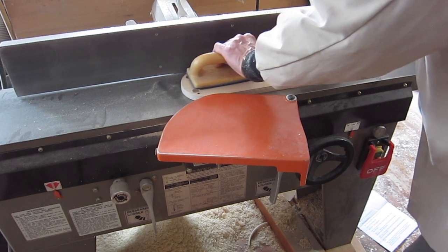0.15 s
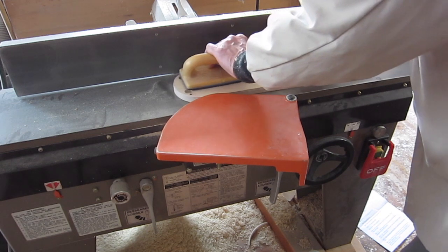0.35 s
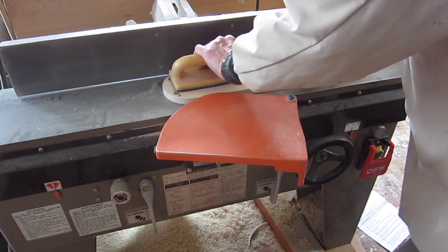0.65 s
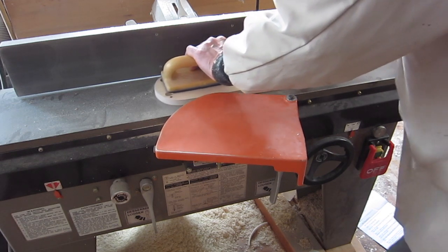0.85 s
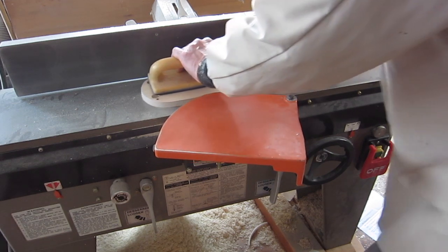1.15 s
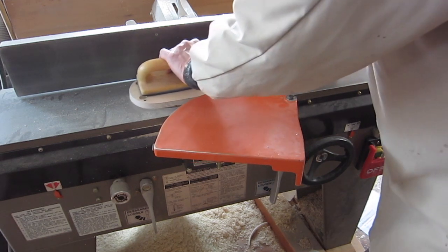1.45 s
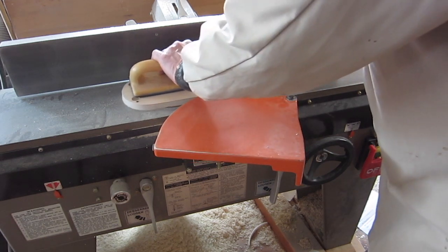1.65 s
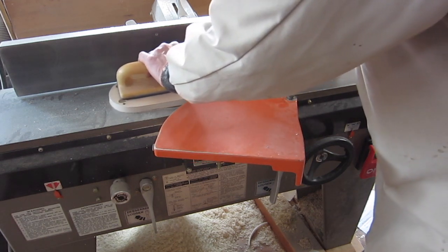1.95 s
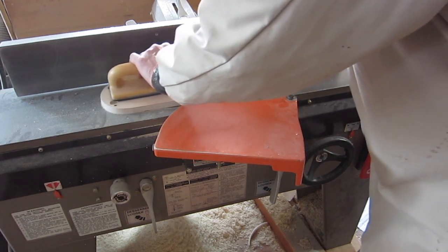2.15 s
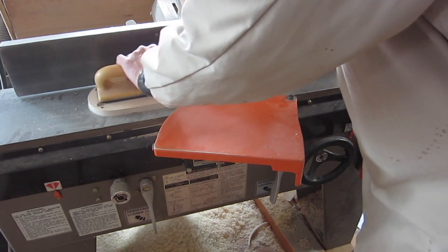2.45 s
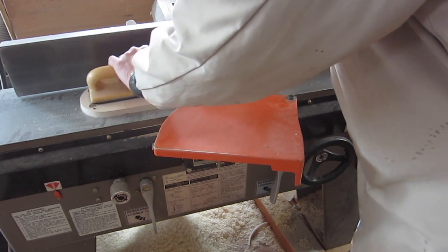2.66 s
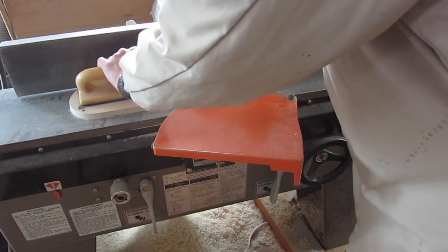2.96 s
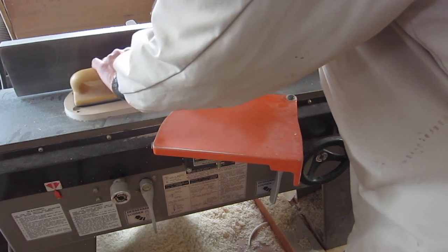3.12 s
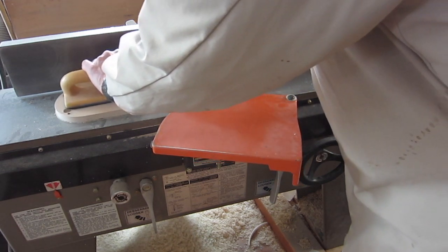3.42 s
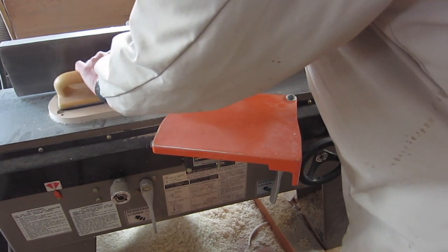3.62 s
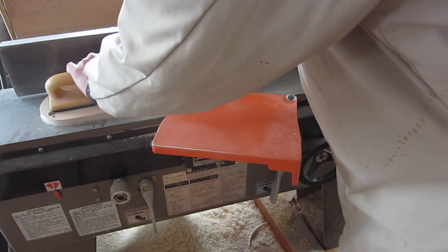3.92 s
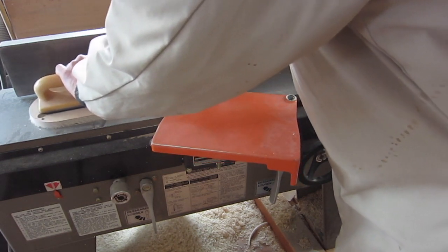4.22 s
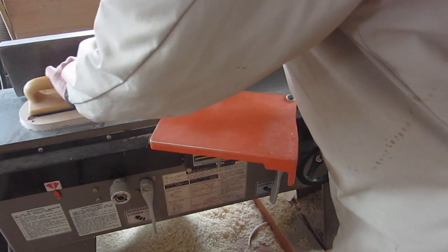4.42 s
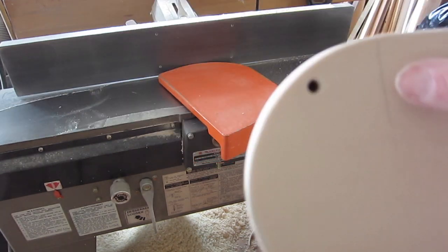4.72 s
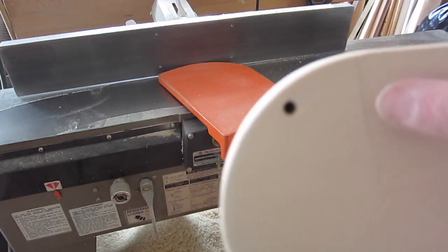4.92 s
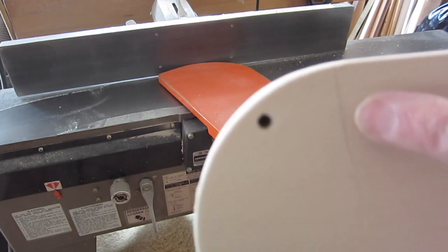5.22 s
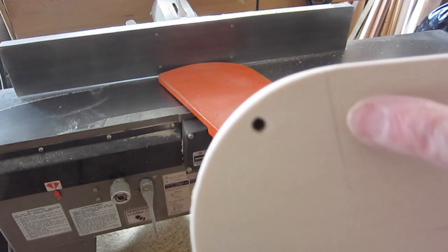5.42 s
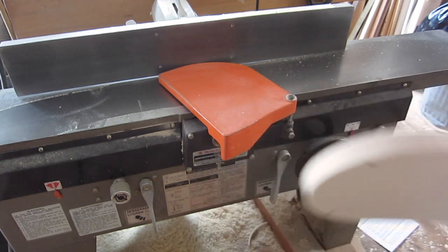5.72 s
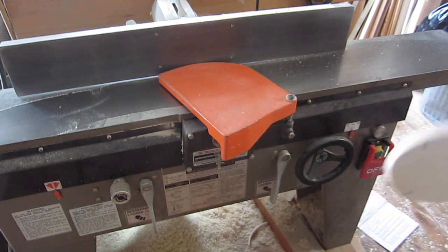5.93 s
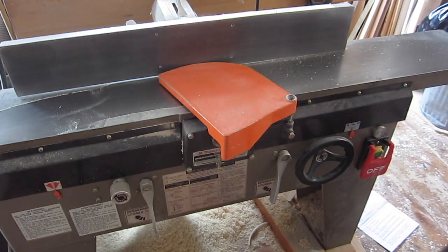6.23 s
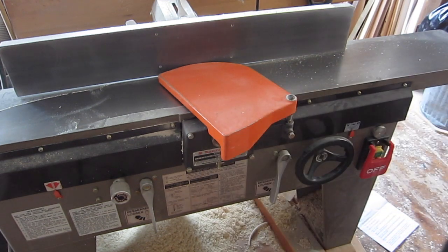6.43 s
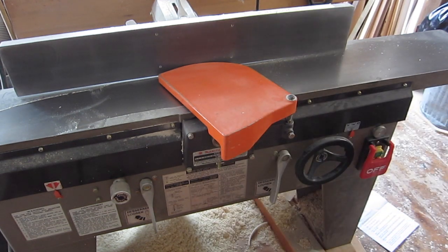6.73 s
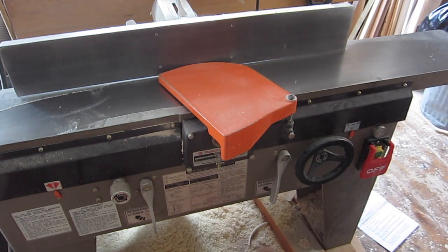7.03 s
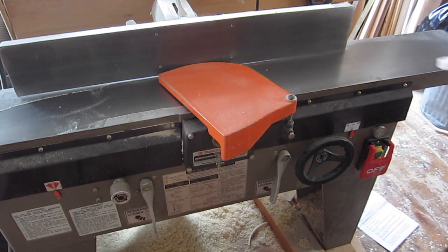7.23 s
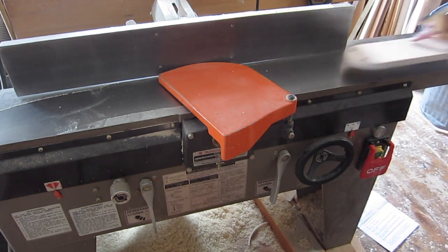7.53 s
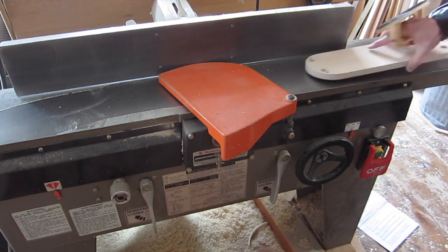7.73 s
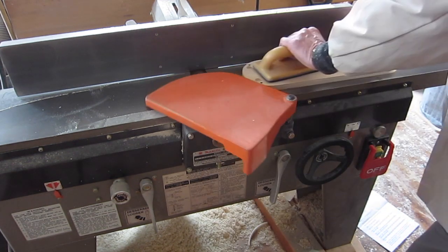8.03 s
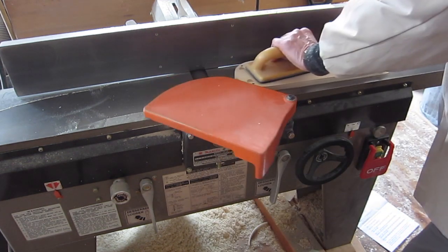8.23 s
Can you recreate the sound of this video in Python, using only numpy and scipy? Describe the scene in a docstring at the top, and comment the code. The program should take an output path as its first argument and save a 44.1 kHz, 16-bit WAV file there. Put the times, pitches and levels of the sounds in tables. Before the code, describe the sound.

A jointer's spinning cutterhead skims plywood with a loud singing, rasping roar that sags in pitch, then abruptly changes to a steady open whir.

```python
"""A singing, rasping roar comes first: a jointer's five-row spiral cutterhead skims plywood close by in a workshop.
The cut drags the speed down and later lets it recover a little; sine tones for cutters and motor follow its
multiples, over filtered noise for air whir and chip hiss, and short ticks and a buzz for the bites.
Then the sound jumps to the same machine running free: open whir, a siren tone, motor hum and whine.
A few soft low bumps, made of short bursts of rumble, fall in both parts."""
import sys
import numpy as np
from scipy import signal
from scipy.fft import rfft, irfft, next_fast_len
from scipy.io import wavfile

SR = 44100
rng = np.random.default_rng(int(sys.argv[2]) if len(sys.argv) > 2 else 0)


def to_wav(s):
    """Save 16-bit WAV."""
    ch = np.atleast_2d(s).T  # columns
    pcm = np.round(np.clip(ch, -1, 1) * 32767)  # PCM
    wavfile.write(sys.argv[1], SR, pcm.astype(np.int16))


N = 369116
T = np.arange(N) / SR  # time (s)
LEFT_RIGHT = np.array([[1], [-1]])  # the side signal is added on the left, subtracted on the right
JUMP_S = 4.525  # middle of the jump from cutting to running free
TOP_HZ = 15500  # nearly nothing is left above this
ROWS = 5  # rows of cutters round the head

# motor tones as multiples of head speed: its hum, its whine and the side tone just under the whine
HUM, WHINE, UNDER_WHINE = 2.7, 32.58, 31.33

# Background
# faint even hiss on top [f/Hz, level/dB per Hz]
FIZZ = [(7000, -130), (10500, -96), (15500, -96)]
# soft low bumps, before their rise and decay shape them [t/s, level/dB]
BUMPS = [(1.089, -50), (1.2, -53), (6.119, -59), (6.199, -55), (7.385, -47), (7.46, -59), (7.939, -59)]
# filter for the bumps [f/Hz, level/dB]
BUMP_COLOUR = [(20, -16), (50, -4), (85, -1), (140, 0), (300, -30), (1000, -80)]
# spread between the ears [f/Hz, side minus mid/dB]
WIDTH = [(60, -43), (120, -32), (250, -20.5), (500, -19.5), (1000, -14.5), (2000, -8.5), (4000, -1.5),
         (8000, -3), (12000, -3.5)]
# lean of the sound [f/Hz, left minus right/dB]
LEAN = [(60, 0), (250, 0), (1000, -0.3), (2000, -1.6), (4000, -1), (8000, 2), (12000, -1)]

# Speed of the head
# turning speed while cutting [t/s, turns a second/Hz]
CUT_SPEED = [(0.0, 101.63), (0.35, 101.25), (0.7, 100.05), (1.5, 95.67), (2.0, 93.44), (2.5, 91.76),
             (2.95, 90.91), (3.6, 90.85), (4.1, 91.83), (4.5, 93.34)]
# turning speed running free [t/s, turns a second/Hz]
FREE_SPEED = [(4.5, 104.85), (5.5, 105.15), (7.8, 105.72), (7.98, 106.45), (8.37, 106.45)]

# Air and running free
# air torn by the head at the table lips, before cavities and gain [f/Hz, level/dB per Hz]
AIR = [(25, -99), (50, -100), (100, -80.5), (160, -74.5), (250, -70), (460, -65), (650, -61.5),
       (1000, -59.5), (1400, -61), (3200, -64.5), (4100, -68.5), (6000, -73), (10000, -86), (12500, -99)]
# cavities of the guard, tables and chute [f/Hz, width/Hz, lift/dB]
CAVITIES = [(241, 67, 5.5), (375, 67, 6.5), (614, 88, 7), (859, 90, 5), (1142, 154, 2.5), (1560, 57, 3.5),
            (1682, 52, 3.5), (2078, 274, 6), (2510, 160, 4), (2880, 230, 2), (3160, 76, 5), (3380, 190, 2),
            (3630, 160, 1), (4700, 120, -1.5), (5800, 350, 2.5), (6300, 200, 2), (7840, 390, 4.5)]
# gain of the whir running free [t/s, level/dB]
FREE_WHIR = [(4.5, -1.1), (5.2, -1), (6.1, 0), (6.3, -1.1), (6.8, -0.5), (7.8, -1), (7.9, -1.5),
             (8.37, -0.5)]
# siren tone of the five rows passing the table lip, running free [t/s, level/dB]
SIREN = [(4.5, -36.5), (5.2, -35.5), (5.8, -38.5), (6.15, -37.5), (6.35, -48), (6.7, -36.5), (7.75, -35.5),
         (7.95, -43), (8.37, -40.5)]
# other tones running free [multiple of head speed, first level/dB, last level/dB]
FREE_TONES = [(1, -52.5, -49.5), (2, -58.5, -43.5), (HUM, -43, -45), (6.96, -42.5, -44), (9, -44, -47),
              (10, -43, -38.5), (15, -42, -53), (WHINE, -38.5, -43.5)]
ROW_PULSING, TURN_PULSING = .16, .38  # share by which the whir pulses per row, and the chip spray per turn
STIR_DB, STIR_RATE = 1.0, 19  # eddies in the whir: depth (dB), new random values a second
FADE_DB, FADE_RATE = 1, 2.51  # fading of the free-running tones: depth (dB), new random values a second

# Bites and chips
# gains while the board is fed [t/s, air whir/dB, chip hiss/dB]
FEED = [(0, -5.5, -4.5), (.6, -6, -5), (1.2, -5, -4), (1.5, -6.5, -4.5), (2, -6, -5), (2.5, -9.5, -9),
        (3, -6.5, -10), (3.5, -7, -6), (3.9, -6, -9), (4.5, -10, -5)]
# splinters leaving the board, before gain [f/Hz, level/dB per Hz]
CHIPS = [(200, -92), (500, -65.5), (900, -64.5), (1800, -69.5), (3200, -72), (4500, -76), (6300, -73.5),
         (8200, -78), (10000, -84.5), (12500, -125)]
# buzz of the cutter that stands proudest, once a turn, before gain [f/Hz, level/dB per Hz]
BUZZ = [(300, -100), (700, -70), (1600, -67), (2600, -77), (3500, -76), (5000, -77), (7800, -83),
        (9500, -85), (12000, -120)]
BITE_RING_S = .018  # the ring of one bite in board and table falls to about a third in this time
# how hard each of the five rows strikes the wood, one standing proud [level/dB]
ROW_STRIKES_DB = [-7, 0, -6, -12, -12]
# sharp chop of the cutters entering the wood [t/s, level/dB]
CHOP = [(0, -34), (.8, -36), (1.05, -39.5), (1.24, -33.5), (1.55, -42), (1.8, -41), (2.05, -35.5),
        (2.7, -34), (2.95, -41), (3.3, -38.5), (3.8, -36.5), (4.5, -39)]
# filter for the chop [f/Hz, level/dB]
CHOP_COLOUR = [(200, -22), (600, -3), (1400, -3), (2200, -5), (2700, -2), (3100, 5), (3600, 2), (4200, -6),
               (6500, -10), (8000, -19), (10000, -28), (12500, -50)]
CHOP_SCATTER_DB, CHOP_JITTER_TURNS = 2, .003  # random spread of strike strength and angle

# Singing
# tone of the rows passing as the board slides over the head [t/s, level/dB]
ROW_TONE = [(0, -41), (.42, -48), (.75, -35.5), (1.03, -34.5), (1.27, -27), (1.48, -35), (2.4, -36),
            (3.5, -40.5), (4.1, -28.5), (4.47, -35.5)]
# its octave, at twice the frequency [t/s, level/dB]
ROW_OCTAVE = [(0.02, -35), (.8, -36.5), (1.3, -38), (1.6, -38), (2.1, -34.5), (2.52, -43.5), (2.72, -39),
              (3.22, -49), (3.82, -27.5), (4.12, -25.9), (4.47, -33)]
# its twelfth, at three times the frequency [t/s, level/dB]
ROW_TWELFTH = [(0.02, -55), (0.22, -43), (1.72, -43), (1.82, -33.5), (2.22, -31), (2.62, -36.6),
               (3.02, -49), (3.82, -40.5), (4.47, -36.5)]
# its higher overtones at full bite, before resonances [f/Hz, level/dB]
ROW_OVERTONES = [(1800, -45), (2300, -46), (2800, -46), (3400, -48.5), (4200, -49), (5500, -53),
                 (7800, -53.5)]
# whine of the staggered cutters at full bite, one multiple below each row tone [f/Hz, level/dB]
STAGGER = [(380, -48), (1300, -50), (2300, -50.5), (2700, -47), (3400, -42.5), (4500, -46.5), (6000, -47.5),
           (7500, -48.5), (9300, -55)]
# hum of shaft and cutters, then motor hum and whine, before resonances [multiple of head speed, level/dB]
DRIVE_TONES = [(1, -72), (2, -59), (3, -57), (6, -45), (11, -49), (33, -60), (36, -53.5), (37, -53),
               (43, -52), (HUM, -54), (2 * HUM, -53.5), (3 * HUM, -50), (UNDER_WHINE, -49), (WHINE, -42.5)]
# stand, tables and board: a tone swells while the speed carries it across one [f/Hz, width/Hz, lift/dB]
RESONANCES = [(94.5, 6.5, 12.5), (195.3, 7.6, 10.5), (275.3, 11, 7.5), (521.6, 26, 18.5), (880, 36, 2),
              (1776, 64, 9), (1990, 71, 7), (2205, 49, 6), (3010, 69, 5), (3307, 8.7, 9.5)]
# one tone flares up as the board slides on [t/s, multiple of head speed, half length/s, peak/dB]
SQUEALS = [(.1, WHINE, .6, -35), (.1, 34, .25, -32.5), (.08, 79, .2, -49), (.1, 30, 0.37, -44),
           (.1, 69, 0.2, -42.5), (.1, 59, .2, -43), (.15, 2 * HUM, 0.35, -42.5), (.15, 84, .25, -51),
           (.2, 74, .12, -48), (.22, 35, 0.49, -36), (.25, 64, .2, -46), (.34, 49, 0.23, -38.5),
           (.36, 39, 0.34, -36.5), (.574, 54, 0.26, -37.5), (.7, 34, 0.22, -37.5), (.75, 64, .16, -42.5),
           (.8, 2 * HUM, 0.13, -40), (.83, 69, 0.13, -46), (.97, 59, .18, -41.5), (.85, 35, .25, -41),
           (1.204, 79, .15, -37.5), (1.15, 84, .27, -43.5), (1.24, 20, 0.07, -36), (1.24, 54, 0.079, -42.5),
           (1.24, 74, .13, -45), (1.25, 25, 0.26, -35.5), (1.15, 9, .28, -40.5),
           (1.33, 2 * HUM, .25, -34.5), (1.417, UNDER_WHINE, 0.047, -34.5), (1.42, 64, .15, -44),
           (1.57, 79, .14, -40), (1.6, 89, .25, -50), (1.75, 84, .2, -49), (1.82, 54, 0.16, -42.5),
           (1.9, 44, 0.32, -38.5), (1.95, 40, .18, -44), (1.97, 49, .19, -41), (2, 19, .23, -47),
           (2, 79, .14, -42), (2, 69, 0.27, -44), (2.08, 64, .19, -42), (2.1, 45, .15, -43),
           (2.12, 30, .25, -40), (2.47, 35, .23, -39), (2.5, 34, .3, -41.5), (2.52, 54, .18, -42.5),
           (2.6, 49, .22, -44), (2.65, 6, .38, -40.5), (2.73, 64, 0.2, -43), (2.73, 69, 0.22, -44.5),
           (2.73, 84, 0.18, -55), (2.85, 25, 0.59, -40.5), (3, 44, 0.33, -34), (3.2, 24, 0.31, -43),
           (3.248, 54, .2, -43.5), (3.4, 34, .38, -39), (3.51, 20, 0.31, -33.5), (3.55, 59, .16, -42),
           (3.58, 64, 0.21, -43), (3.65, 49, .3, -42), (3.75, 40, .18, -41), (3.78, 74, 0.2, -39.5),
           (3.8, 39, .2, -38.5), (3.8, 33, .18, -44), (3.87, 35, .28, -40), (3.87, 79, 0.19, -45.5),
           (3.97, 59, 0.14, -42), (4.05, WHINE, .29, -34.5), (4.18, 84, .15, -54), (4.33, 44, .2, -39),
           (4.33, 35, 0.16, -45), (4.4, 39, 0.11, -44), (4.44, 64, .14, -41), (4.44, 30, .12, -40.5),
           (4.3, 54, 0.19, -44), (4.4, 74, 0.14, -47), (4.44, 49, 0.092, -45), (4.31, 94, 0.17, -54)]
BITE_DB_PER_DB_KHZ = 0.16  # a lighter bite dulls the tones: dB lost per dB of chip hiss and per kHz
# a wave reflected in the sliding board weakens each tone now and then, high tones more deeply and more often
REFLECTION_PER_KHZ, REFLECTION_MAX = .17, .85  # strength of the reflection
NULL_RATE, NULL_RATE_PER_KHZ = 0.804, .11  # average cancellations a second


def undb(db):
    """Decibels to gain."""
    return 10 ** (np.asarray(db) / 20)


def curve(rows, t, axis=1):
    """One column of a time table, joined by straight lines."""
    rows = np.array(rows)
    return np.interp(t, rows[:, 0], rows[:, axis])


def spectrum(rows, hz):
    """Level in dB at hz, straight lines on a log-frequency axis."""
    rows = np.array(rows)
    return np.interp(np.log(hz + 1), np.log(rows[:, 0]), rows[:, 1])


def colour(x, rows, cavities=()):
    """Filter x by a spectrum, lifted or dipped round each cavity resonance."""
    size = next_fast_len(x.shape[-1], real=True)
    hz = np.fft.rfftfreq(size, 1 / SR)
    db = spectrum(rows, hz)
    for f, width, lift in cavities:
        db = db + lift / (1 + (2 * (hz - f) / width) ** 4)
    return irfft(rfft(x, size) * undb(db), size)[..., :x.shape[-1]]


def noise(t):
    """Mid and side noise of 0 dB per Hz."""
    return rng.standard_normal((2, len(t))) * np.sqrt(SR / 2)


def ears(pair):
    """Mid and side to left and right; the bass stays near the middle."""
    return pair[0] + LEFT_RIGHT * colour(pair[1], WIDTH)


def walk(t, rate):
    """Slow chance: random values of spread 1, rate of them a second, joined by straight lines."""
    return np.interp(t * rate, np.arange(1024), rng.standard_normal(1024))


def turns(speed, t, flutter):
    """Revolutions of the head so far; the belt lets the speed flutter by a small share."""
    return np.cumsum(curve(speed, t) * (1 + flutter * walk(t, 24.9))) / SR


def tone(t, angle, multiple, db, waver_db, side_db=-4.5):
    """One multiple of the head speed; it wavers, and reaches the two ears with a drifting phase."""
    phase = 2 * np.pi * ((multiple * angle + rng.random()) % 1)
    mid = np.sin(phase.astype(np.float32))
    side = np.sin((phase + np.pi * walk(t, 1.196)).astype(np.float32))
    mean_hz = multiple * angle[-1] / (t[-1] - t[0])
    spread = undb(side_db + spectrum(WIDTH, mean_hz))
    # the root of two makes db an effective (RMS) level
    return np.sqrt(2) * undb(db + waver_db * walk(t, 14)) * (mid + LEFT_RIGHT * spread * side)


def strikes(angle, at_turns, strength):
    """One impulse each time the head reaches one of the given angles, placed between samples by a sinc."""
    at = np.interp(at_turns, angle, np.arange(len(angle)))
    taps = np.minimum(at.astype(int)[:, None] + np.arange(-7, 9), len(angle) - 1)
    out = np.zeros(len(angle))
    np.add.at(out, taps, np.sinc(taps - at[:, None]) * strength[:, None])
    return out


def fizz():
    """A faint steady hiss: noise filtered to the top of the treble."""
    return ears(colour(noise(T), FIZZ))


def bumps(rise_s=.008, decay_s=.05):
    """A few dull, low thuds under the machine noise: rumble that rises fast and dies away."""
    push = 0
    for s, db in BUMPS:
        age = np.maximum(T - s + rise_s, 0)
        push = push + undb(db) * (1 - np.exp(-age / rise_s)) * np.exp(-age / decay_s)
    rumble = colour(rng.standard_normal(N), BUMP_COLOUR)
    return push * rumble / rumble.std()


def whir(t, angle, flicker_db=0.56):
    """Turbulent air rings the cavities, pulsing as each row of cutters passes the table lip."""
    pulsing = 1 + ROW_PULSING * np.sin(2 * np.pi * ROWS * angle)
    flicker = undb(flicker_db * walk(t, 18))
    air = colour(noise(t) * pulsing * flicker, AIR, CAVITIES)
    # eddies stir each stretch of the spectrum below 2800 Hz on its own
    out = 0
    for edge_hz in (700, 1400, 2800):
        low = signal.sosfiltfilt(signal.butter(2, edge_hz, fs=SR, output="sos"), air)
        out = out + low * undb(STIR_DB * walk(t, STIR_RATE))
        air = air - low
    return ears(out + air)


def running_free(t):
    """The unloaded head spins faster: open whir, siren tone of the five rows, motor hum and whine."""
    angle = turns(FREE_SPEED, t, flutter=.0008)
    siren = tone(t, angle, ROWS, 0, waver_db=1.8)
    out = whir(t, angle) * undb(curve(FREE_WHIR, t)) + siren * undb(curve(SIREN, t))
    for multiple, first_db, last_db in FREE_TONES:
        db = np.linspace(first_db, last_db, len(t)) + FADE_DB * walk(t, FADE_RATE)
        # short waves are stirred more by the moving air
        out += tone(t, angle, multiple, db, waver_db=0.62 * multiple ** 0.34)
    return out


def chips(t, angle):
    """Splinters hiss off the narrow board in one spray a turn."""
    once_a_turn = 1 + TURN_PULSING * np.cos(2 * np.pi * angle)
    spray = once_a_turn * undb(.7 * walk(t, 70))
    return ears(colour(noise(t) * spray, CHIPS))


def buzz(t, angle):
    """One bite a turn rings board and table briefly, filling in all multiples of the speed."""
    count = np.arange(1, int(angle[-1]))
    bites = strikes(angle, count, undb(.7 * rng.standard_normal(len(count))))
    age = T[:SR // 10]
    ring = rng.standard_normal((2, len(age))) * np.exp(-age / BITE_RING_S)
    rung = signal.fftconvolve(bites[None], ring)[:, :len(t)]
    # bring it to 0 dB per Hz before colouring
    return ears(colour(rung / rung.std() * np.sqrt(SR / 2), BUZZ))


def chop(t, angle):
    """Each row enters the wood with a dry tick; the proud row makes it rasp once a turn."""
    rows = np.arange(ROWS, ROWS * int(angle[-1]))
    size, slip = rng.standard_normal((len(rows), 2)).T
    strength = undb(np.array(ROW_STRIKES_DB)[rows % ROWS] + CHOP_SCATTER_DB * size)
    at_turns = rows / ROWS + CHOP_JITTER_TURNS * slip
    ticks = colour(strikes(angle, at_turns, -strength), CHOP_COLOUR)
    return ticks / ticks.std() * undb(curve(CHOP, t))


def cutter_tone(t, angle, multiple, db):
    """A tone lifted by the resonances it crosses and weakened by its reflection; some break into a squeal."""
    hz = multiple * curve(CUT_SPEED, t)
    khz = hz.mean() / 1000
    ring_db = sum(lift / (1 + (2 * (hz - f) / width) ** 2) for f, width, lift in RESONANCES)
    reflection = min(REFLECTION_PER_KHZ * khz, REFLECTION_MAX)
    # each whole step of the path brings one cancellation
    path = (NULL_RATE + NULL_RATE_PER_KHZ * khz) * t + rng.random() + 0.19 * walk(t, 2.01)
    interference = 1 + 2 * reflection / (1 + reflection ** 2) * np.cos(2 * np.pi * path)
    power = undb(db + ring_db) ** 2 * interference
    for s, which, length, peak_db in SQUEALS:
        if abs(which - multiple) < .1:
            power = power + undb(peak_db) ** 2 * np.exp(-np.abs((t - s) / length) ** 3)
    return tone(t, angle, multiple, 10 * np.log10(power), waver_db=1.65)


def singing(t, angle, bite_db, row_waver_db=1.0):
    """The rows sing a harmonic series, their stagger a second one just below; shaft and motor hum along."""
    speed = curve(CUT_SPEED, t)
    out = 0
    for k, level in enumerate((ROW_TONE, ROW_OCTAVE, ROW_TWELFTH), 1):
        out = out + tone(t, angle, ROWS * k, curve(level, t), row_waver_db)
    overtones = ROW_OVERTONES, ROWS * np.arange(4, 18)
    stagger = STAGGER, ROWS * np.arange(1, 21) - 1
    for levels, multiples in (overtones, stagger):
        for multiple in multiples:
            hz = multiple * speed
            dull_db = BITE_DB_PER_DB_KHZ * bite_db * hz / 1000
            out += cutter_tone(t, angle, multiple, spectrum(levels, hz) + dull_db)
    for multiple, db in DRIVE_TONES:
        out += cutter_tone(t, angle, multiple, db)
    return out


def cutting(t, buzz_follow=0.58):
    """The board rides over the head: singing tones, chop, buzz, chips and a muffled whir."""
    angle = turns(CUT_SPEED, t, flutter=0.00016)
    whir_db, chip_db = curve(FEED, t), curve(FEED, t, axis=2)
    out = whir(t, angle) * undb(whir_db)
    out = out + chips(t, angle) * undb(chip_db)
    # the buzz follows the chip hiss, but less strongly
    out = out + buzz(t, angle) * undb(buzz_follow * chip_db)
    return out + chop(t, angle) + singing(t, angle, chip_db)


def scene():
    """The cut, then the free-running machine, joined over 10 ms, with bumps and fizz throughout."""
    free = np.clip((T - JUMP_S) / .01 + .5, 0, 1)
    out = bumps() + fizz()
    out[:, free < 1] += cutting(T[free < 1]) * np.sqrt(1 - free[free < 1])
    out[:, free > 0] += running_free(T[free > 0]) * np.sqrt(free[free > 0])
    return out


def record(dry):
    """The two microphone ports differ slightly in colour; a steep low-pass filter cuts the top."""
    ports = []
    for x, sign in zip(dry, (1, -1)):
        half_lean = [(hz, sign * db / 2) for hz, db in LEAN]
        ports.append(colour(x, half_lean))
    return signal.sosfilt(signal.ellip(8, .2, 70, TOP_HZ, fs=SR, output="sos"), ports)


dry = scene()
out = record(dry)
to_wav(out)
```